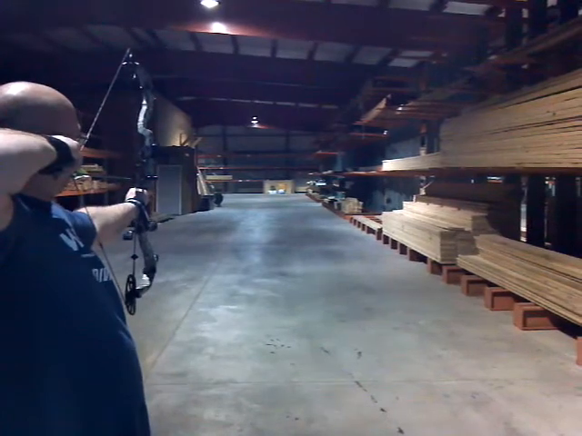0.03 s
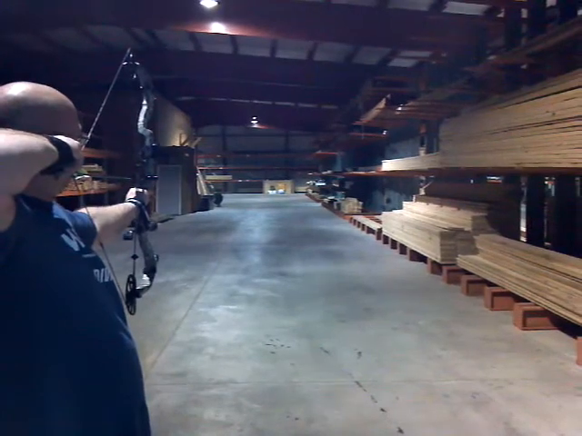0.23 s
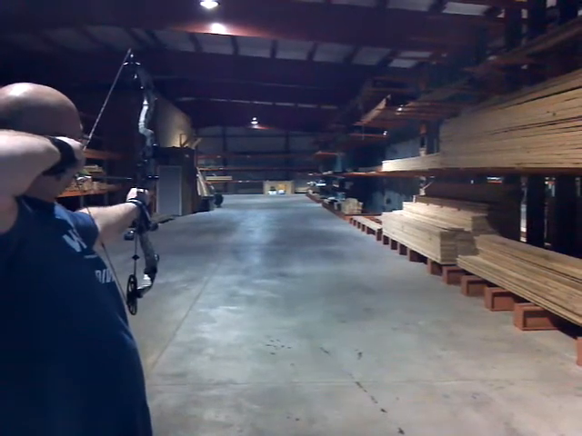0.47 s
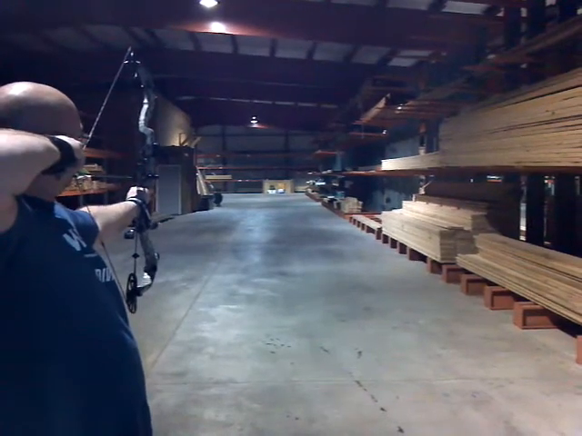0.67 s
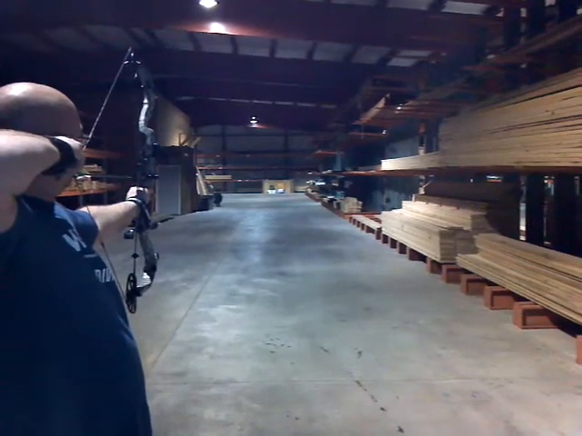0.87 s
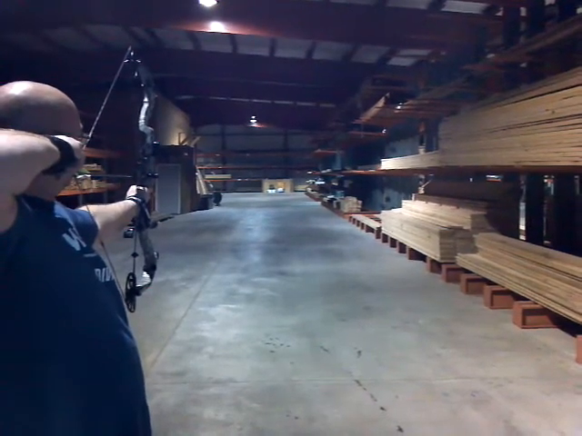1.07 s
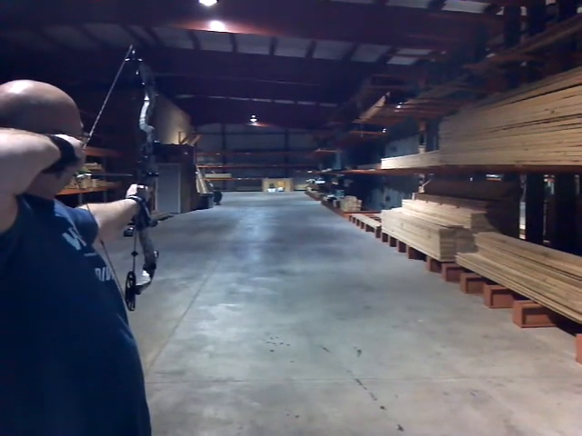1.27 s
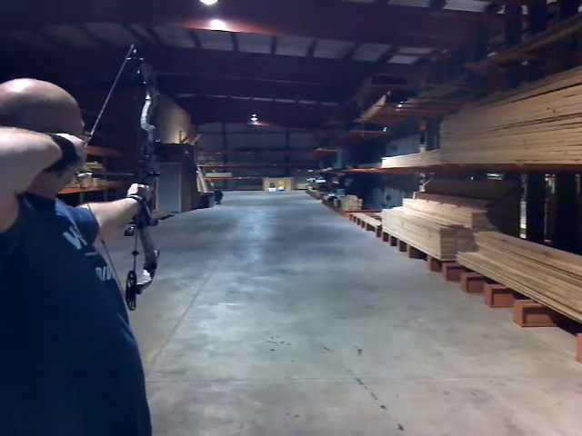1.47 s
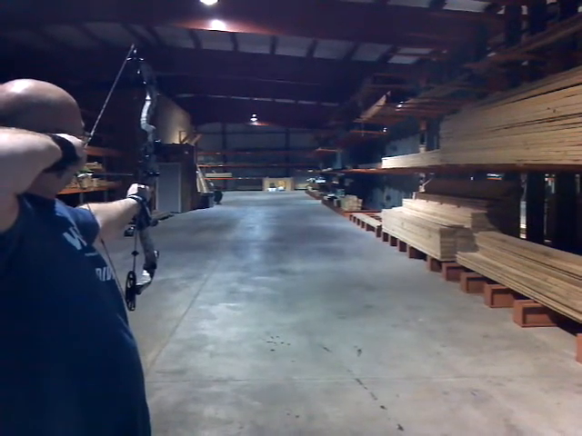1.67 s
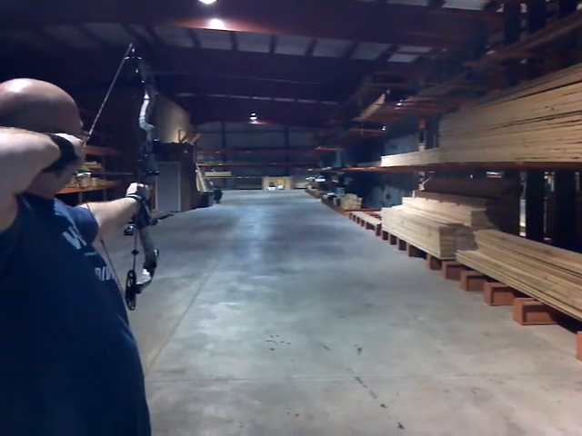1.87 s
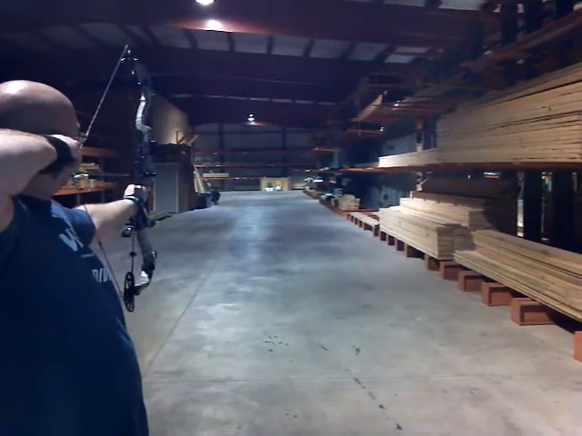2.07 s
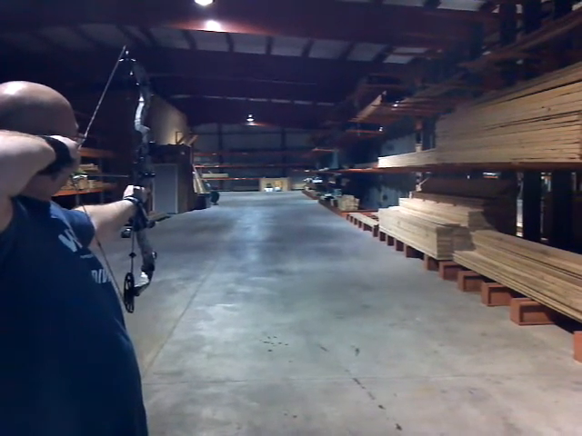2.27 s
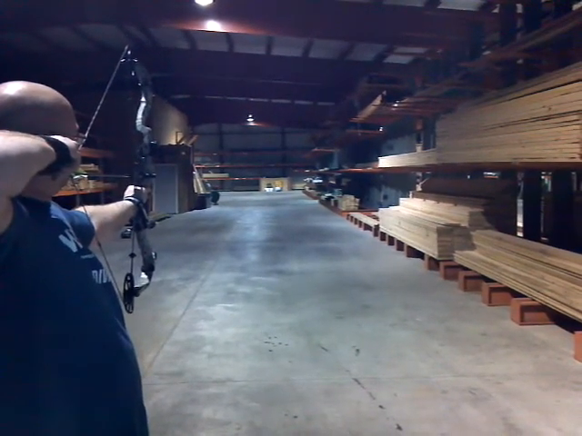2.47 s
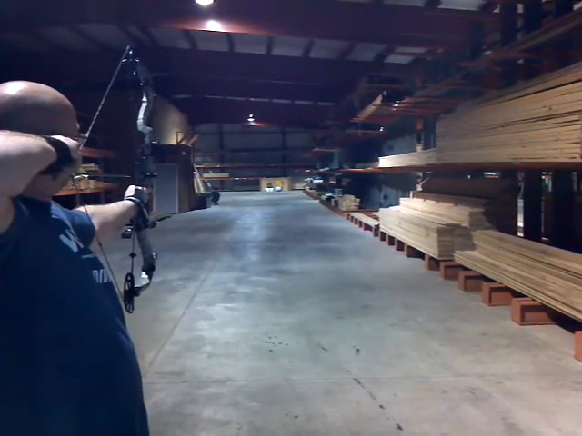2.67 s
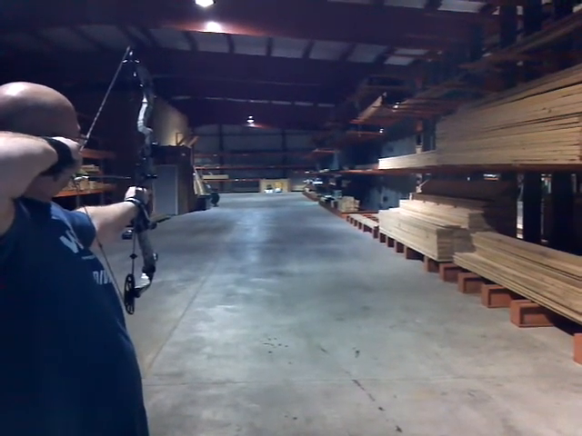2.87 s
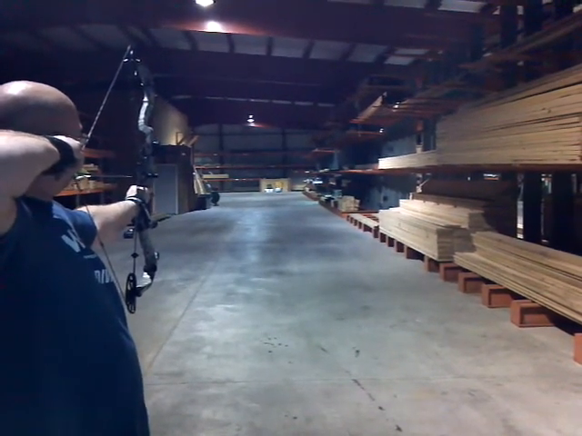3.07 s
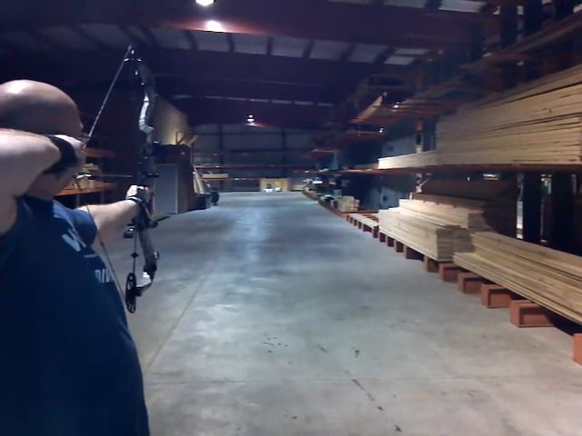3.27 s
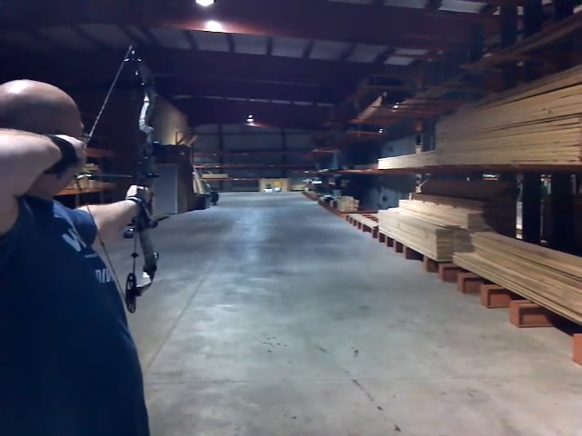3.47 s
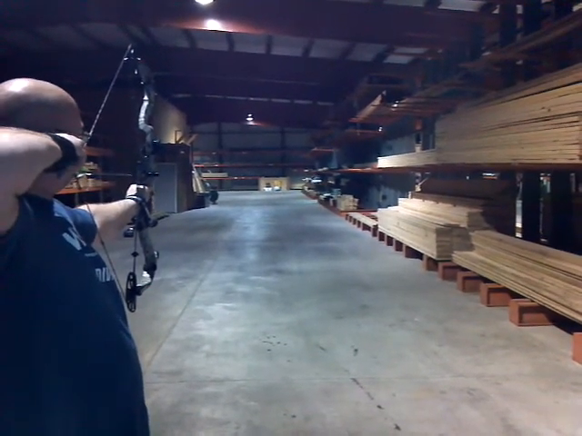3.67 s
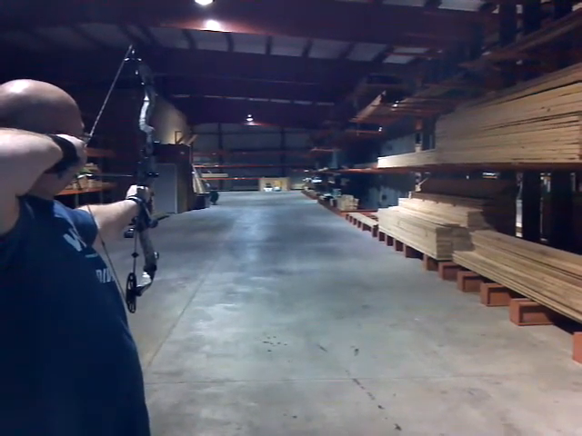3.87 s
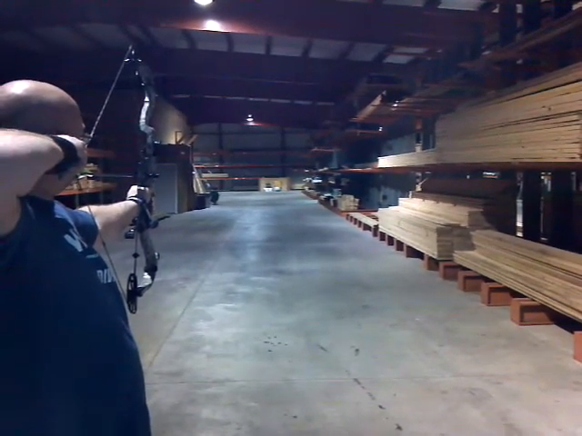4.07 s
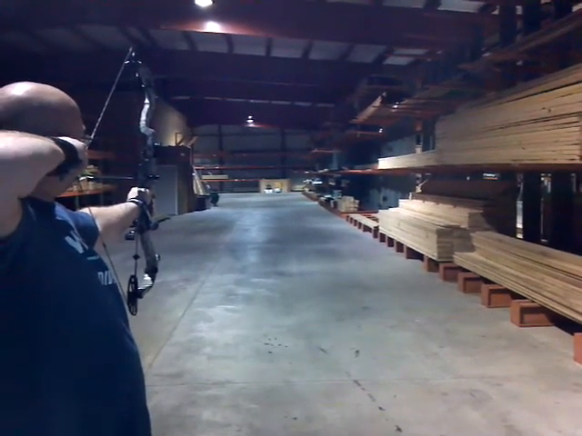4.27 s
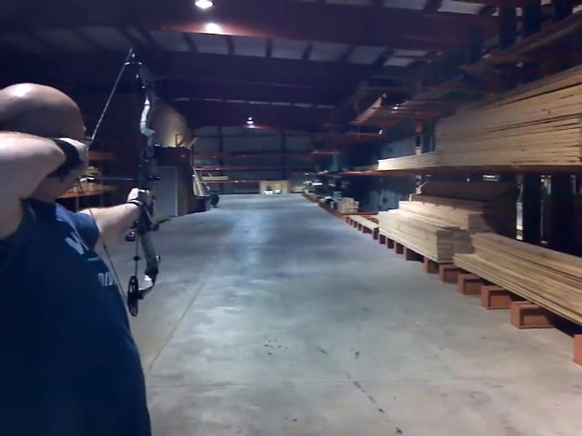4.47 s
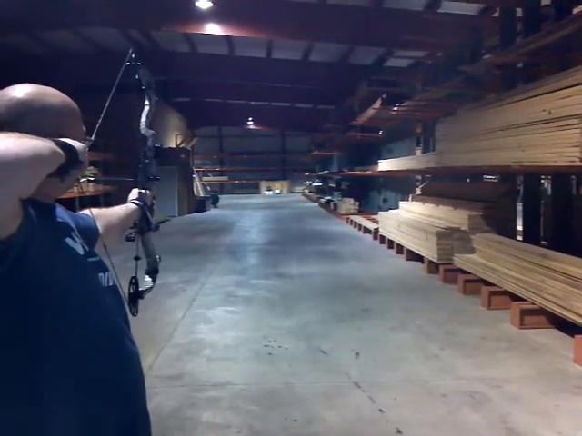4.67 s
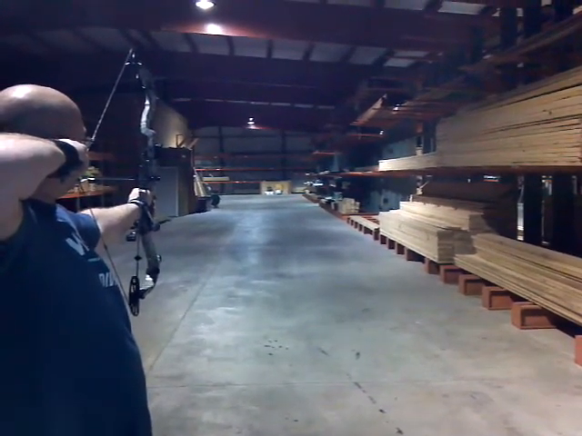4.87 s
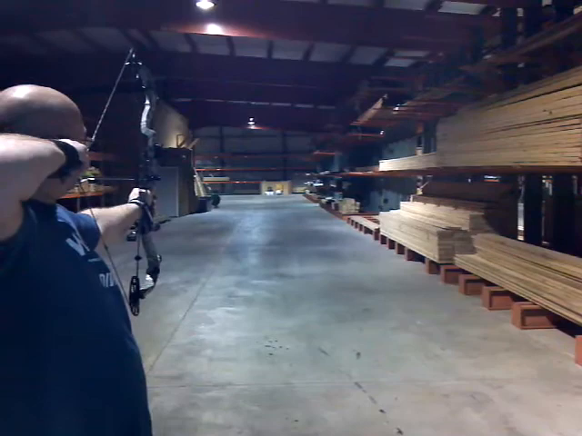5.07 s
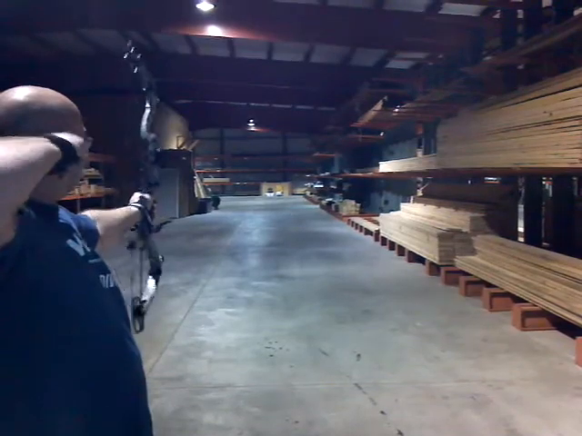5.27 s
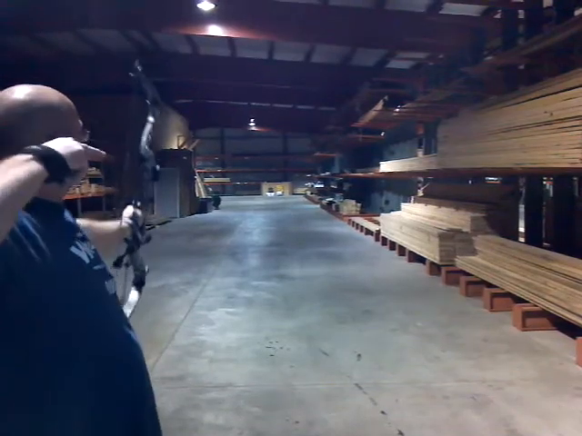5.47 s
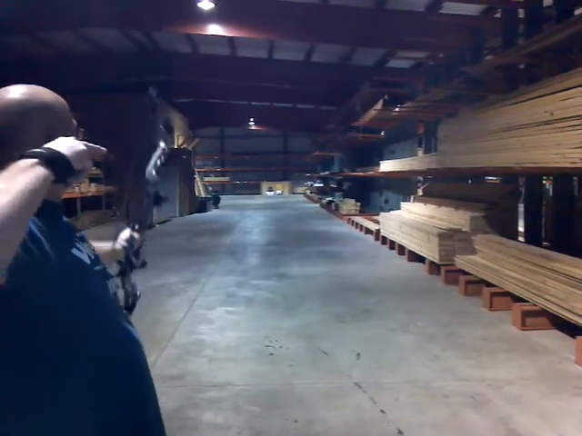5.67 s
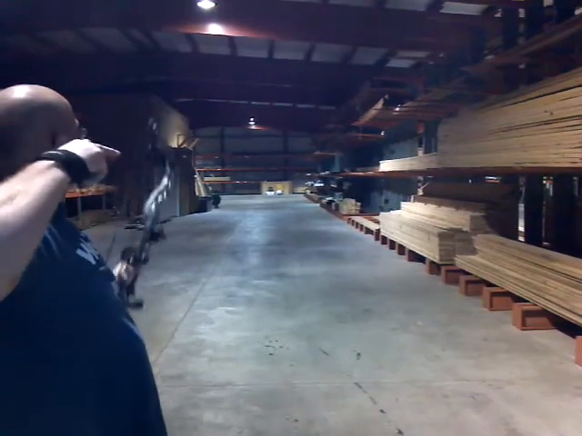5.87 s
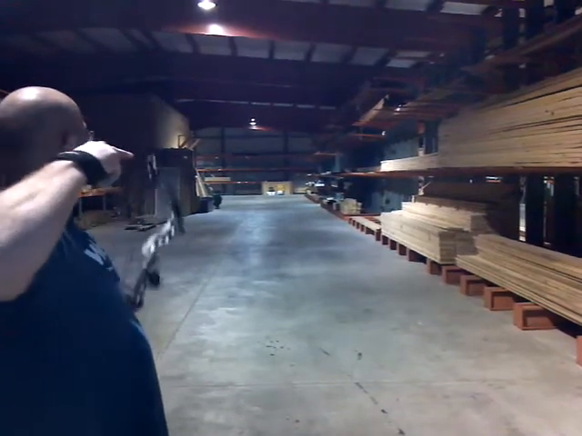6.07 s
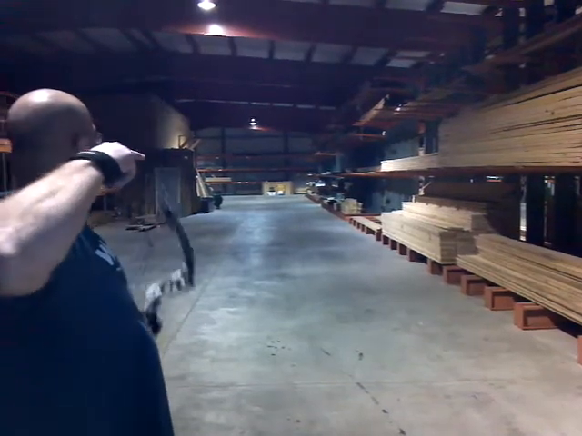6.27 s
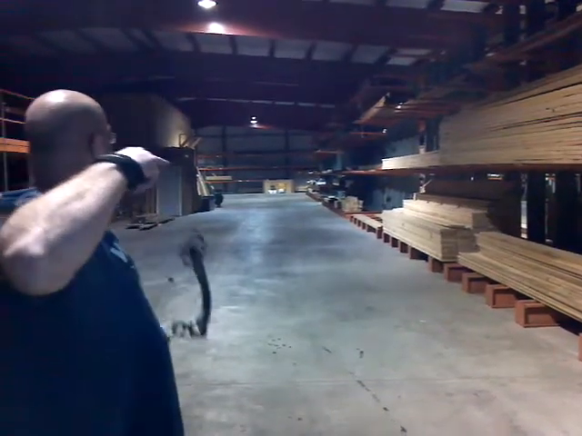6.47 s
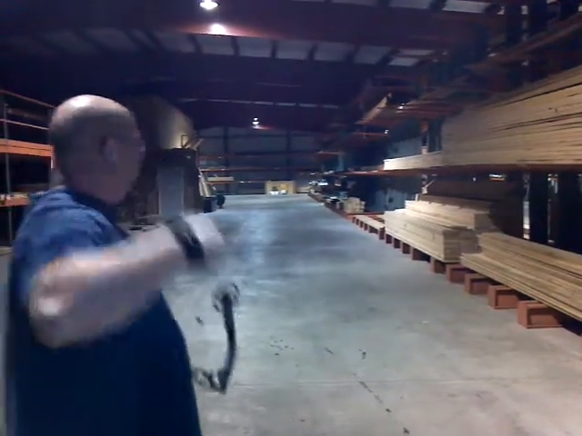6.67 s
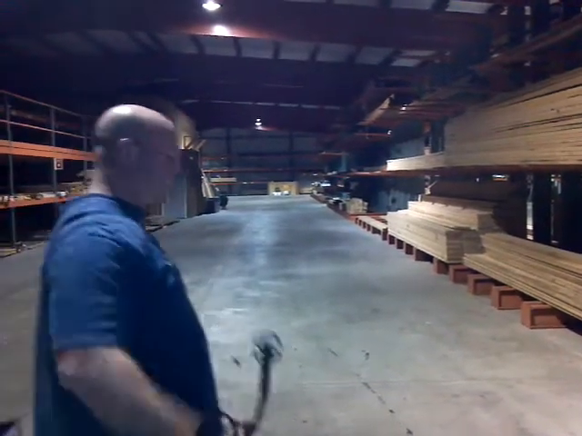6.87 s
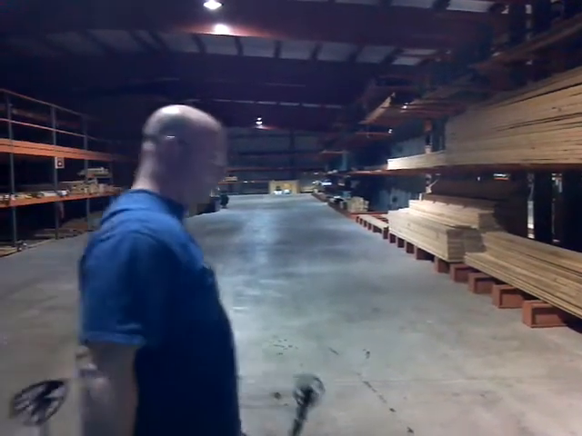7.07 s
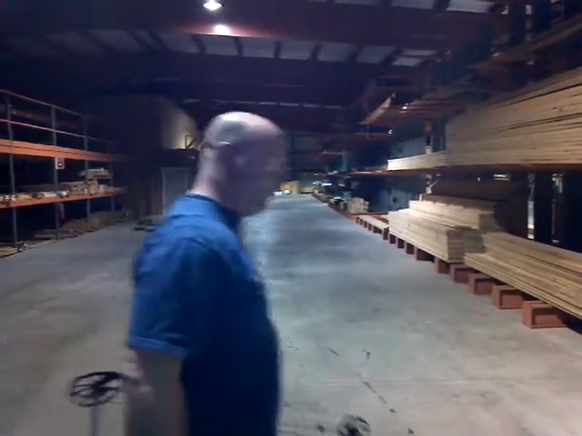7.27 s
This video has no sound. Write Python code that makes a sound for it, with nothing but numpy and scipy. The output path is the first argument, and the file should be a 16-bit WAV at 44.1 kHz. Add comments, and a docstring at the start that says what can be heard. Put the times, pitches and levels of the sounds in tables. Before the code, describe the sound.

Faint electrical hum and hiss, then a loud bowstring crack with ringing limbs, a dull far thump under a second later, and long hall reverberation.

```python
"""Lamps buzz over hiss, a thin whine and a low rumble that fades, then swells near 5 s, in a long steel
warehouse. An archer's release clicks at 5.3 s; the string hisses, slaps its stop repeatedly and the limbs ring
on. The arrow thumps into a far target at 6.1 s and flutters between the end walls; small clicks and cloth
rustle follow. Modes are damped sines, reverberation and hiss are shaped noise, the buzz is a sum of sines. Two
close capsules are steered left and right by subtracting each, delayed, from the other."""
import sys
import numpy as np
from scipy import signal
from scipy.fft import rfft, irfft
from scipy.io import wavfile
from scipy.ndimage import uniform_filter1d

SR = 44100
rng = np.random.default_rng(int(sys.argv[2]) if len(sys.argv) > 2 else 0)


def log_audio(samples):
    """Write samples as a 16-bit WAV file to the path given in sys.argv[1]."""
    # one column per channel
    frames = np.atleast_2d(samples).T
    # limit to full scale, then quantise
    limited = np.clip(frames, -1, 1)
    pcm = np.round(limited * 32767).astype(np.int16)
    wavfile.write(sys.argv[1], SR, pcm)


N = 322582

# Stereo layers hold a shared part (alike in both capsules) and an opposed part (opposite signs).
# Levels are those ahead of the steering in record().


def gain_of(db):
    """Amplitude factor of a level in dB."""
    return 10 ** (np.asarray(db) / 20)


def read(points, hz, index=1):
    """One column of a table, interpolated on a log-frequency axis."""
    rows = np.transpose(points)
    return np.interp(np.log(hz + 1), np.log(rows[0] + 1), rows[index])


def band(x, lo_hz, hi_hz):
    """Butterworth band-pass."""
    return signal.sosfilt(signal.butter(2, [lo_hz, hi_hz], "bandpass", fs=SR, output="sos"), x)


def add(mix, start_s, sound):
    """Adds a sound in place, cut at the end of the mix."""
    part = mix[round(start_s * SR):][:len(sound)]
    part += sound[:len(part)]


def ring(modes, rough=0., grain_s=.0003, rise_s=.0001):
    """Damped modes after a blow; a longer rise softens it, rough adds noisy beating."""
    t = np.arange(SR // 3) / SR
    width = max(round(grain_s * SR), 1)
    grain = uniform_filter1d(rng.standard_normal((len(modes), len(t))), width, axis=1)
    wobble = 1 + rough * np.sqrt(width) * grain
    out = np.zeros(len(t))
    for (hz, db, t60_s), w in zip(modes, wobble):
        out += gain_of(db - 60 * t / t60_s) * np.sin(2 * np.pi * hz * t) * w
    return out * (1 - np.exp(-t / rise_s))


def noise(shared_db, opposed_db, count, size):
    """Shared and opposed noise from random short-time spectra; levels in dB per Hz, frames by bins."""
    shape = (count * 4 // size + 5, size // 2 + 1)
    real, imag = rng.standard_normal((2, 2, *shape))
    levels_db = np.array([np.broadcast_to(shared_db, shape), np.broadcast_to(opposed_db, shape)])
    spectra = (real + 1j * imag) * gain_of(levels_db) * np.sqrt(1.5 * SR / size)
    return signal.istft(spectra.transpose(0, 2, 1), nperseg=size, noverlap=size * 3 // 4)[1][:, :count]


def bow():
    """The string hisses as it gains speed, then slaps: a crack and a blow on the limbs each time."""
    # String slapping its stop and rebounding. Each row: start in seconds, crack in dB, blow on the limbs in dB.
    slaps = [(5.2963, -18, -19.5), (5.3005, -23, -22.5), (5.3045, -26, -18), (5.309, -24, -27.5),
             (5.3142, -27, -25), (5.3195, -34, -35.5)]
    # Modes of the crack. Each row: frequency in Hz, level in dB relative to the crack, t60 in seconds.
    crack_modes = [(6700, 2.5, 0.0065), (8460, -3.5, 0.0055), (5760, -3, 0.0078), (14340, -5, .006),
                   (3600, -11, 0.012), (12000, -14.5, 0.0038)]
    # Modes of the limbs. Each row: frequency in Hz, level in dB relative to the blow, t60 in seconds.
    limb_modes = [(411, -6, 0.066), (699, -13.5, 0.025), (798, -4.5, 0.039), (910, -7.5, 0.033),
                  (1150, -9, 0.039), (2460, -23.5, 0.028), (3000, -26.5, 0.038), (3320, -18, 0.049)]
    # Long-ringing main modes of the limbs, struck once at the first slap. Each row: frequency in Hz, level in
    # dB relative to the ring's gain, t60 in seconds.
    limb_ring_modes = [(358.4, 0, 0.23), (380.3, -4.5, 0.17), (650, -18, 0.34), (1270, -19.5, 0.45),
                       (2096, -12, 0.3)]
    out, t = np.zeros(N), np.arange(-.012, 0, 1 / SR)
    first_s = slaps[0][0]
    hiss = gain_of(-23.5 + 1900 * t) * band(rng.standard_normal(len(t)), 1850, 6700)
    add(out, first_s + t[0], hiss)
    add(out, first_s, gain_of(-22.0) * ring(limb_ring_modes, rough=0.33, grain_s=0.006, rise_s=0.0089))
    for start_s, crack_db, blow_db in slaps:
        crack = gain_of(crack_db) * ring(crack_modes, rough=0.9)
        limbs = gain_of(blow_db) * ring(limb_modes, rough=0.32, grain_s=0.00203, rise_s=0.00098)
        add(out, start_s, crack + limbs)
    return out


def clicks():
    """Release aid and small hardware: a wide tick together with a bright mode and its weaker neighbours."""
    # Each row: start in seconds, gain in dB, main mode in Hz, t60 in seconds.
    click_rows = [(5.272, -27, 9200, 0.017), (5.2748, -24.5, 7250, 0.011), (5.281, -29.5, 7100, .02),
                  (5.559, -42.5, 7240, 0.006), (5.811, -52, 7070, 0.009), (6.824, -43.5, 6560, 0.0061),
                  (6.8646, -42.5, 6600, 0.0051), (7.214, -53.5, 2720, .011)]
    tick_db, tick_t60_s = -5, 0.0022  # tick gain relative to the click
    out, t = np.zeros(N), np.arange(0, .01, 1 / SR)
    for start_s, db, hz, t60_s in click_rows:
        partials = [(1, -3), (1.1, -7), (1.95, -7), (.32, -19), (0.68, -9)]  # frequency ratio, dB
        modes = [(ratio * hz, mode_db, t60_s) for ratio, mode_db in partials]
        add(out, start_s, gain_of(db) * ring(modes, rough=0.61))
        tick = band(rng.standard_normal(len(t)), 3000, 17500)
        add(out, start_s, gain_of(db + tick_db - 60 * t / tick_t60_s) * tick)
    return out


def target():
    """Dull thumps of the foam block, each with a short burst of treble dulled by distance."""
    # Arrow in the target and first strong returns. Each row: start in seconds, blow in dB, treble burst in dB.
    thumps = [(6.1425, -30, -36), (6.151, -29.5, -30), (6.154, -19, -50), (6.161, -34, -33),
              (6.172, -25.5, -50), (6.185, -19.5, -43), (6.196, -31, -49), (6.208, -33, -44.5)]
    # Modes of the block. Each row: frequency in Hz, level in dB relative to the blow, t60 in seconds.
    block_modes = [(305.5, 1.5, 0.038), (164, -12, 0.076), (372, -7.5, 0.03), (220, -12.5, 0.091),
                   (752, -6, 0.038), (854, -7.5, 0.022), (1343, -13, 0.062), (1804, -9.5, 0.043)]
    out, t = np.zeros(N), np.arange(0, .04, 1 / SR)
    for start_s, blow_db, burst_db in thumps:
        add(out, start_s, gain_of(blow_db) * ring(block_modes, rough=0.25, grain_s=0.00223, rise_s=0.00021))
        burst = band(band(rng.standard_normal(len(t)), 2570, 9800), 2450, 9800)
        add(out, start_s, gain_of(burst_db - 60 * t / 0.037) * burst)
    return out


def flutter(x, lo_hz, hi_hz):
    """Repeats along the length of the hall, duller and more smeared on every trip."""
    round_trip_s, trip_db = .3805, -13.5  # gain per trip, besides smear and filter
    t, out = np.arange(0, .1, 1 / SR), np.zeros(N)
    for trip in range(1, 4):
        smear = rng.standard_normal(len(t)) * gain_of(-31 - 60 * t / 0.087)
        smear[0] = 1
        smeared = signal.oaconvolve(x, smear)[:N]
        x = gain_of(trip_db) * band(smeared, lo_hz, hi_hz / trip ** 0.95)
        add(out, trip * round_trip_s, x)
    return out


def arrive(x, lag_s):
    """Splits a direct sound that reaches one capsule before the other into shared and opposed parts."""
    turn = np.exp(1j * np.pi * np.fft.rfftfreq(N, 1 / SR) * lag_s)
    return irfft(rfft(x) * np.array([turn.real, 1j * turn.imag]), N)


def tail(start_s, table, t60_s, rise_s, patchy_db):
    """Diffuse reverberation: surfaces set t60, air takes more treble by frequency squared, patches vary it."""
    # Reverberant field. Each row: frequency in Hz, opposed minus shared in dB.
    spread = [(100, -21.5), (350, -12.5), (700, -7.5), (1500, -2), (3000, 0), (16000, 0)]
    air_db_per_s_khz2 = 0.36
    size, count = 1024, N - round(start_s * SR)
    hz = np.fft.rfftfreq(size, 1 / SR)
    t = np.arange(count * 4 // size + 5)[:, None] * size / 4 / SR
    patches = uniform_filter1d(rng.standard_normal((len(t), len(hz))), size=16, axis=1)
    patches = uniform_filter1d(patches, size=4, axis=0)
    loss_db = t * (60 / t60_s + air_db_per_s_khz2 * (hz / 1000) ** 2)
    level_db = read(table, hz) - 40 - loss_db + patchy_db * patches / patches.std()
    rise = 1 - np.exp(-np.arange(count) / SR / rise_s)
    out = np.zeros((2, N))
    out[:, -count:] = noise(level_db, level_db + read(spread, hz), count, size) * rise
    return out


def rustle():
    """Clothing as the archer turns: fine uneven treble noise, swelling once."""
    peak_s, peak_db = 7.1, -67.5  # gain ahead of the band weights
    before_s, after_s = 0.23, 0.12  # time from and to 5 dB under the peak
    t = np.arange(N) / SR - peak_s
    swell = gain_of(peak_db - 5 * (t / np.where(t < 0, before_s, after_s)) ** 2)
    grain = gain_of(6 * uniform_filter1d(rng.standard_normal(N), size=40))
    cloth = rng.standard_normal((2, N)) * grain
    lower = band(cloth, 5580, 8000) * 2.27
    upper = band(band(cloth, 8500, 15300), 7700, 14900) * 0.88
    return (lower + upper) * swell


def waver():
    """Slow random gain, interpolated in dB between random knots."""
    spread_db, step_s = 2, .3  # standard deviation and spacing of the knots
    knots_s = np.arange(0, N / SR + 1, step_s)
    return gain_of(spread_db * np.interp(np.arange(N) / SR, knots_s, rng.standard_normal(99)[:len(knots_s)]))


def buzz():
    """Lamp tones at multiples of twice the mains frequency, falling, then lifted in a high sizzle."""
    # Multiples that stand out. Each entry: multiple of the base frequency.
    strong = [1, 2, 5, 6, 11, 12, 14, 16, 33, 51, 52, 55, 57]
    # Fainter multiples. Each entry: multiple of the base frequency.
    faint = [3, 4, 7, 9, 17, 20, 21, 22, 25, 26, 28, 49, 50, 54, 56, 58, 59]
    # Multiples that arrive from the side. Each entry: multiple of the base frequency.
    sideways = [14, 25]
    base_hz, base_db, slope_db_per_octave, faint_db = 120.05, -77.5, -4.5, -6.5  # RMS level of the base tone
    sizzle_from_hz, sizzle_db = 5500, 13  # lift by the fittings
    opposed_rel_db, opposed_least_db, sideways_rel_db = -12, -102, 8.5  # relative ones: opposed minus shared
    phase_cycles = np.array([[0], [-.08]])  # shared, opposed
    multiple, t = np.array(strong + faint), np.arange(N) / SR
    shared_db = base_db + slope_db_per_octave * np.log2(multiple) + faint_db * np.isin(multiple, faint)
    shared_db += sizzle_db * (multiple * base_hz > sizzle_from_hz)
    opposed_db = np.maximum(shared_db + opposed_rel_db, opposed_least_db)
    opposed_db = np.where(np.isin(multiple, sideways), shared_db + sideways_rel_db, opposed_db)
    out = np.zeros((2, N))
    for m, a_db, b_db in zip(multiple, shared_db, opposed_db):
        cycles = m * base_hz * t + rng.random() + phase_cycles
        out += np.sqrt(2) * waver() * gain_of([[a_db], [b_db]]) * np.sin(2 * np.pi * cycles)
    return out


def whine():
    """Thin steady tones, stronger in the opposed part."""
    # Each row: frequency in Hz, opposed peak level in dB.
    tones = [(186, -100), (279, -87), (372, -88.5), (465, -87.5), (930, -86), (14360, -85)]
    t = np.arange(N) / SR
    mono = sum(gain_of(db) * np.sin(2 * np.pi * (hz * t + rng.random())) for hz, db in tones)
    return mono * gain_of([[-8], [0]])


def rumble():
    """Distant rumble: low band noise that swells and fades, mostly shared."""
    # Each row: time in seconds, noise gain in dB ahead of the shared and opposed gains.
    points = [(0, -71.5), (1.6, -75.5), (4.0, -81.5), (5.1, -64.5), (5.6, -64.5), (7.32, -76.5)]
    swell = gain_of(np.interp(np.arange(N) / SR, *np.transpose(points)))
    low = band(band(rng.standard_normal((2, N)), 108.5, 195), 96, 280)
    return low * swell * gain_of([[18], [2]])


def hiss_floor():
    """Steady air noise and capsule hiss as noise of fixed spectrum."""
    # Each row: frequency in Hz, shared level in dB per Hz, opposed level in dB per Hz.
    spectrum = [(30, -124, -130), (60, -124, -131), (95, -104, -115), (137, -102, -111), (322, -105, -109),
                (910, -112, -112), (1720, -113, -113), (7600, -116, -116), (14900, -116, -116),
                (16800, -150, -150)]
    hz = np.fft.rfftfreq(2048, 1 / SR)
    return noise(read(spectrum, hz), read(spectrum, hz, index=2), N, size=2048)


def scene():
    """Sums shared and opposed parts, then forms the two capsule signals."""
    # Dense first reflections from floor, racks and body.
    # Each row: frequency in Hz, level in dB ahead of the 40 dB cut.
    bow_near = [(149, -51), (270, -44), (400, -12), (600, -29), (900, -21.5), (1800, -29), (3350, -22),
                (4580, -30.5), (6780, -22.5), (11100, -39.5), (14000, -34), (15800, -46)]
    # Reverberation after the near bow. Each row: frequency in Hz, level in dB ahead of the 40 dB cut.
    bow_tail = [(60, -60), (120, -39), (270, -39), (360, -25), (480, -36.5), (1200, -39.5), (4500, -37.5),
                (7000, -40.5), (10020, -46), (15500, -53)]
    # Reverberation after the far target. Each row: frequency in Hz, level in dB ahead of the 40 dB cut.
    target_tail = [(60, -52), (130, -21.5), (308, -23.5), (520, -37.5), (750, -35), (1400, -32.5),
                   (2120, -26.5), (3440, -28.5), (4870, -38), (7550, -45), (11260, -66.5), (15500, -81)]
    near, far = bow(), target()
    hits = arrive(near, 1.4e-4) + arrive(clicks(), 1.5e-4)
    echoes = flutter(gain_of(-4.5) * far + gain_of(-17.5) * near, 200, 1150)
    hits += arrive(far + echoes, -0.000025)
    hits[1] += .1 * far  # thumps louder in one capsule
    hits += tail(5.297, bow_near, t60_s=0.2, rise_s=0.0012, patchy_db=3.0)
    hits += tail(5.297, bow_tail, t60_s=1, rise_s=0.0089, patchy_db=1.5)
    hits += tail(6.145, target_tail, t60_s=1.48, rise_s=0.014, patchy_db=0.93)
    # bass roll-off of the capsules, on the hits and their reverberation
    thin = signal.sosfilt(signal.butter(8, 130, "highpass", fs=SR, output="sos"), hits)
    shared, opposed = thin + rustle() + buzz() + whine() + rumble() + hiss_floor()
    return np.array([shared + opposed, shared - opposed])


def record(dry):
    """Delay-and-subtract steering, a bass lift that makes up for its loss, a rumble filter and the band limit."""
    steer_samples, edge_hz = 17, 16300
    steered = dry - np.pad(dry[::-1], ((0, 0), (steer_samples, 0)))[:, :N]
    zero, pole = np.exp(-2 * np.pi * np.array([800, 20]) / SR)  # shelf corners in Hz
    lifted = signal.lfilter([1, -zero], [1, -pole], steered)
    clean = signal.sosfilt(signal.butter(2, 25, "highpass", fs=SR, output="sos"), lifted)
    limit = signal.firwin(511, edge_hz, window=("kaiser", 9), fs=SR)
    return signal.oaconvolve(clean, limit[None], "same")


dry = scene()
out = record(dry)
log_audio(out)
```